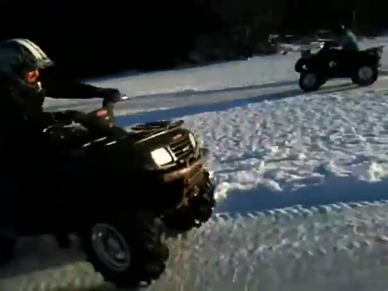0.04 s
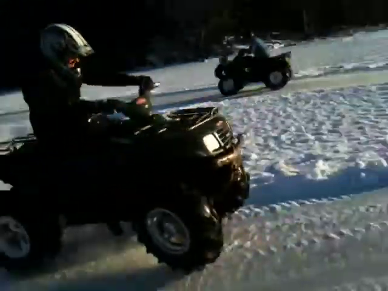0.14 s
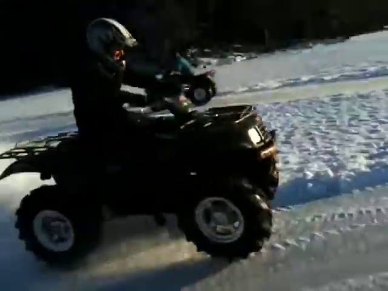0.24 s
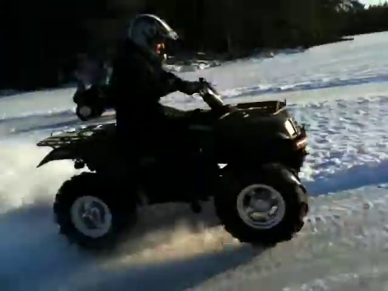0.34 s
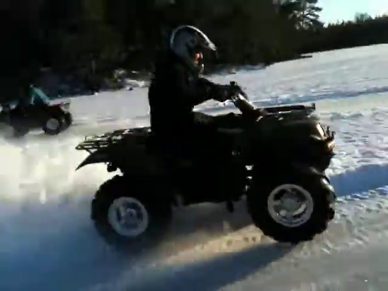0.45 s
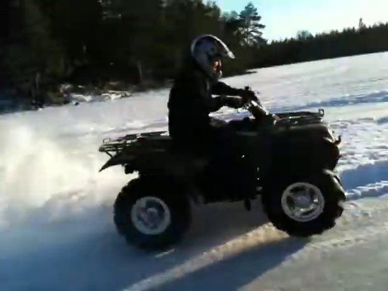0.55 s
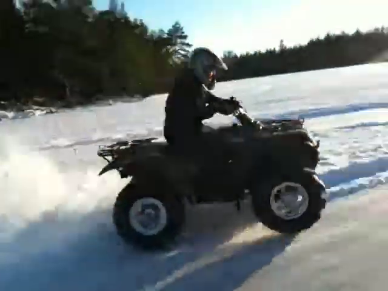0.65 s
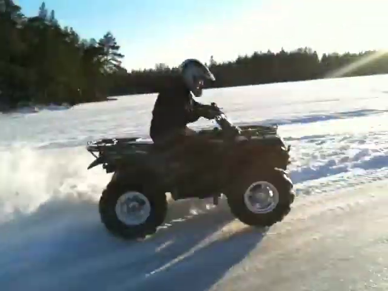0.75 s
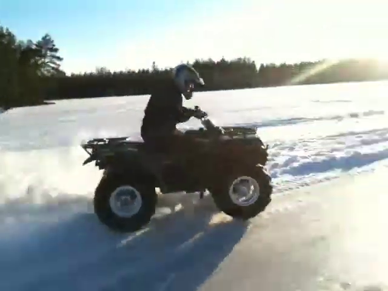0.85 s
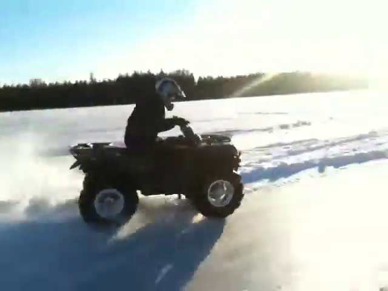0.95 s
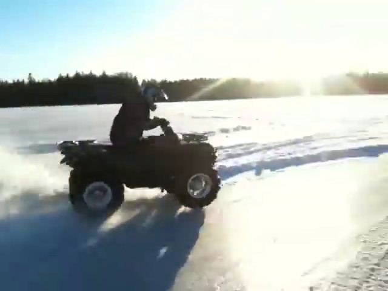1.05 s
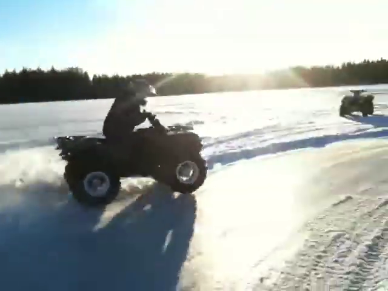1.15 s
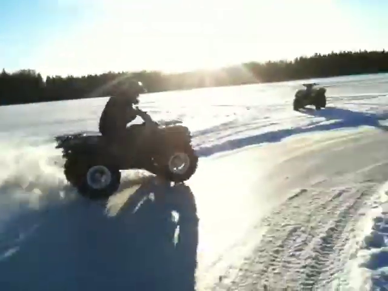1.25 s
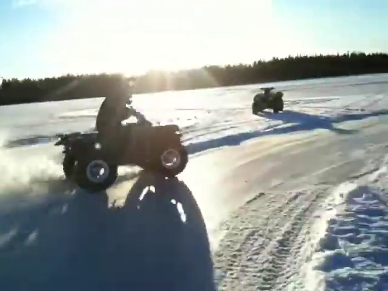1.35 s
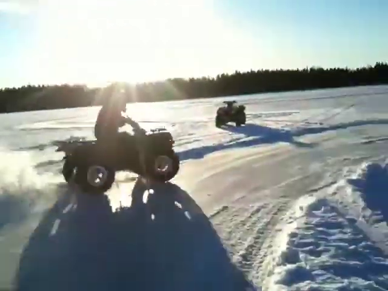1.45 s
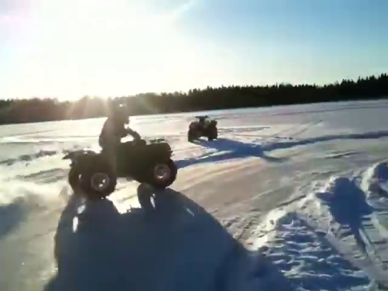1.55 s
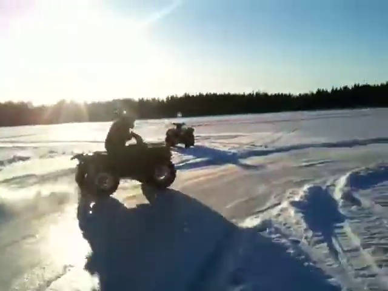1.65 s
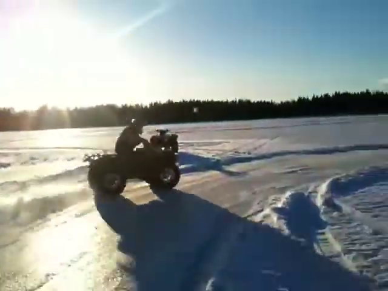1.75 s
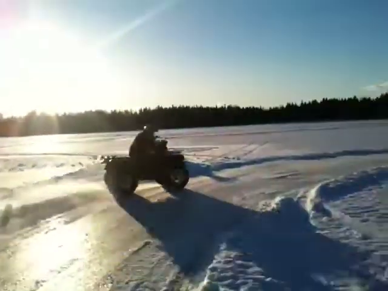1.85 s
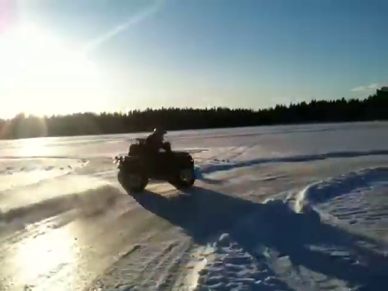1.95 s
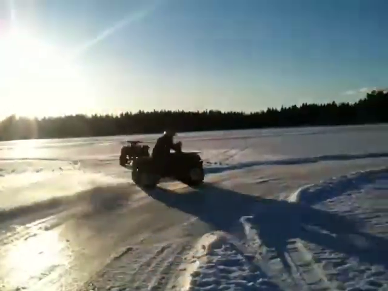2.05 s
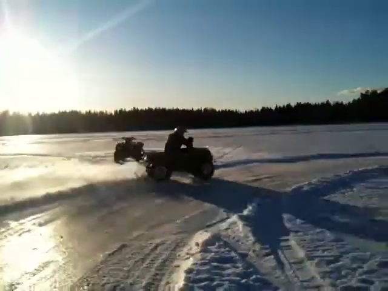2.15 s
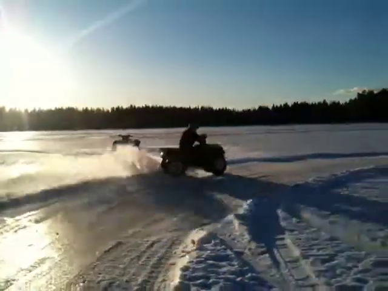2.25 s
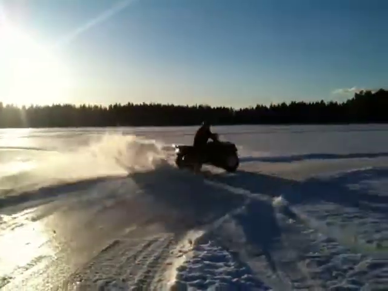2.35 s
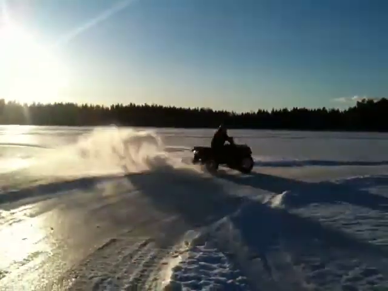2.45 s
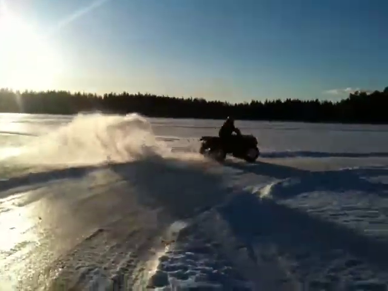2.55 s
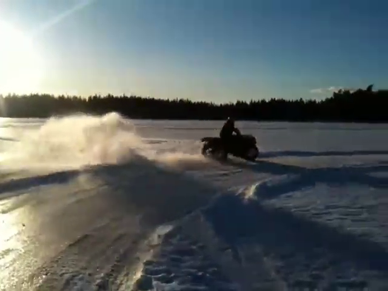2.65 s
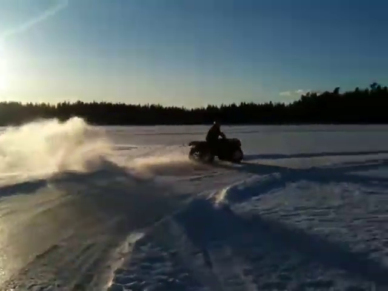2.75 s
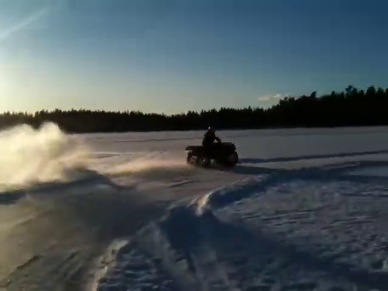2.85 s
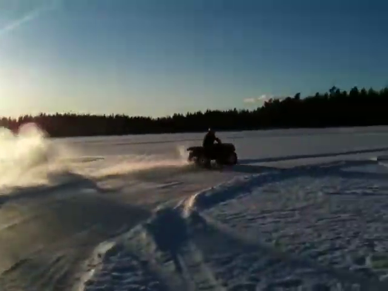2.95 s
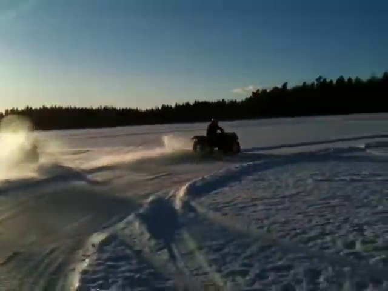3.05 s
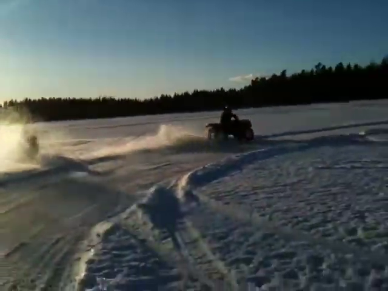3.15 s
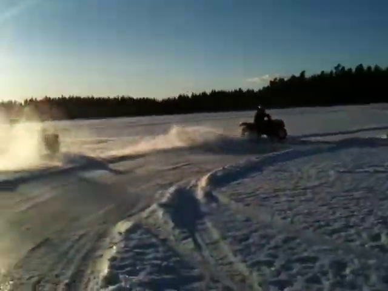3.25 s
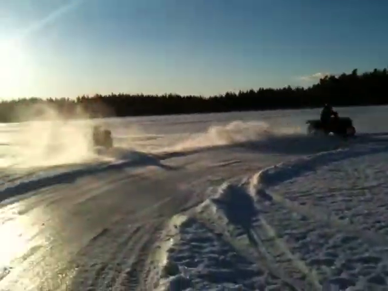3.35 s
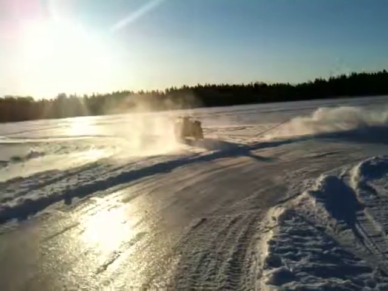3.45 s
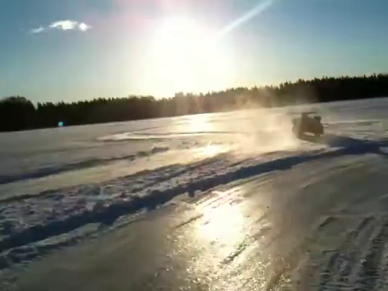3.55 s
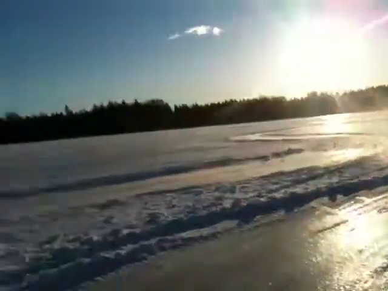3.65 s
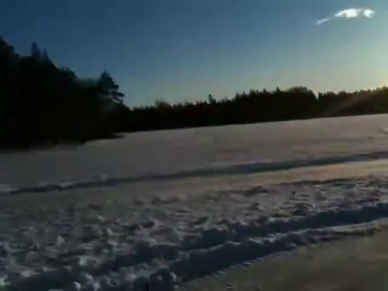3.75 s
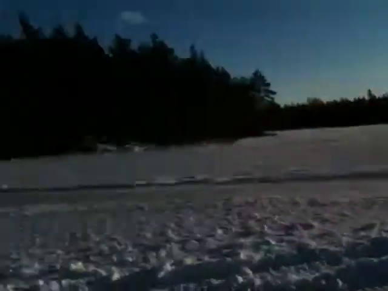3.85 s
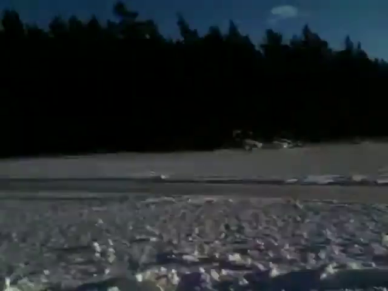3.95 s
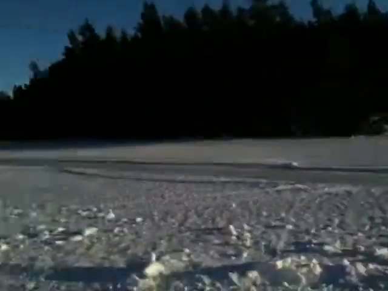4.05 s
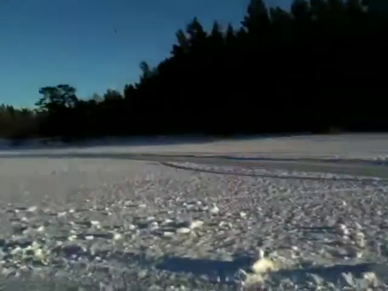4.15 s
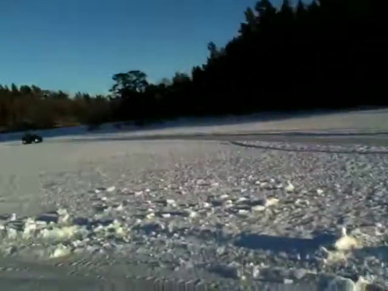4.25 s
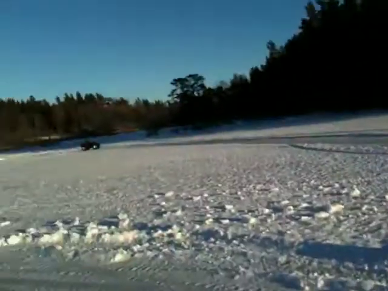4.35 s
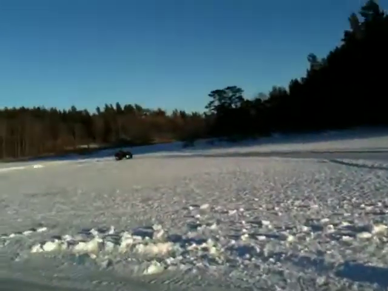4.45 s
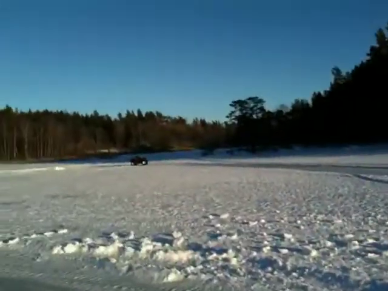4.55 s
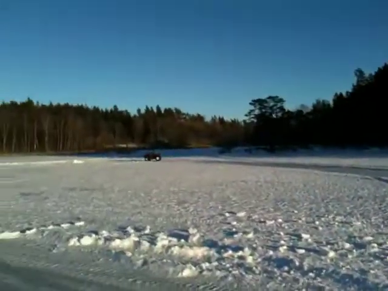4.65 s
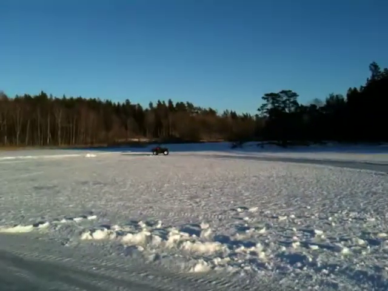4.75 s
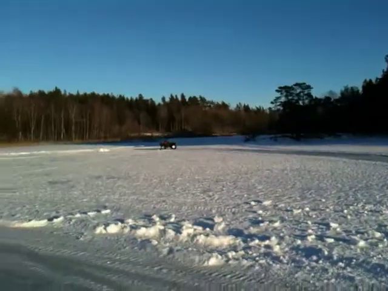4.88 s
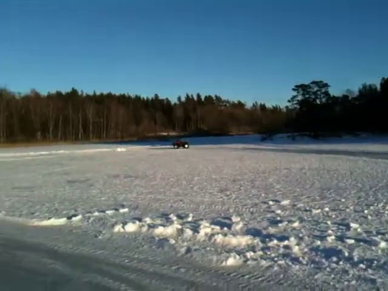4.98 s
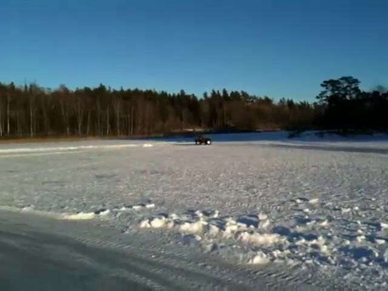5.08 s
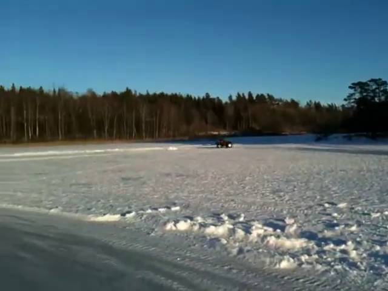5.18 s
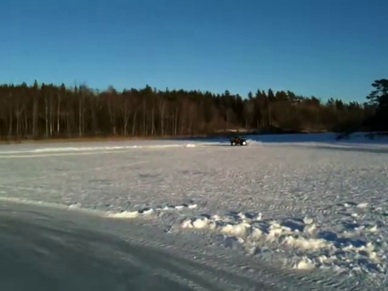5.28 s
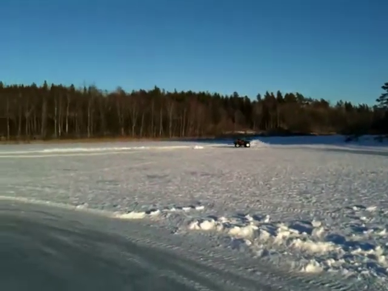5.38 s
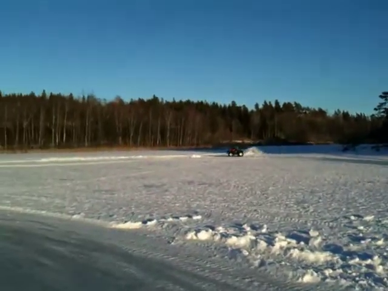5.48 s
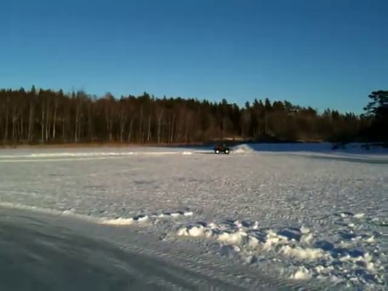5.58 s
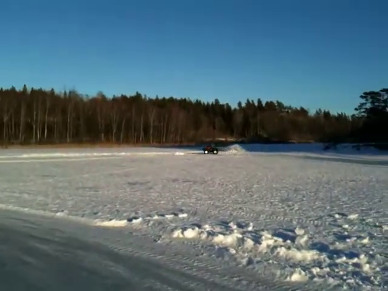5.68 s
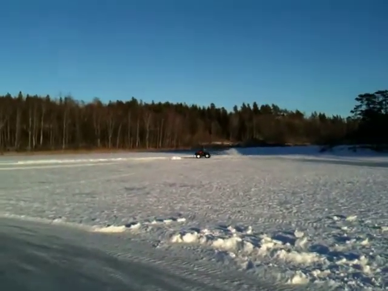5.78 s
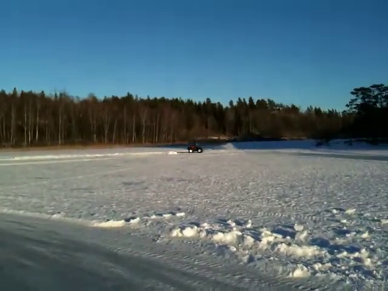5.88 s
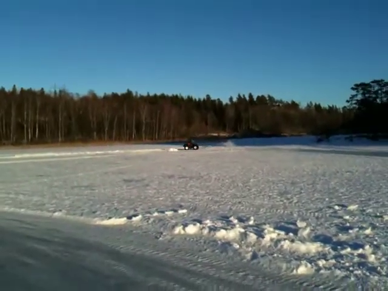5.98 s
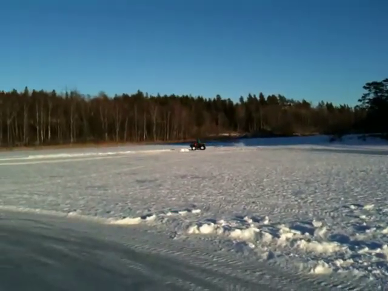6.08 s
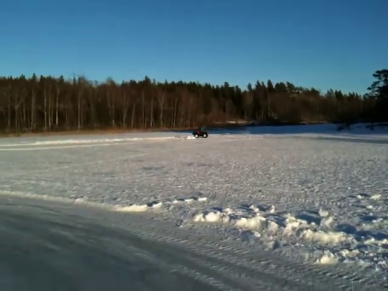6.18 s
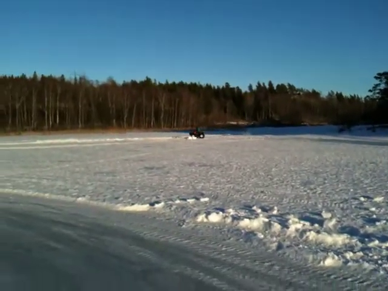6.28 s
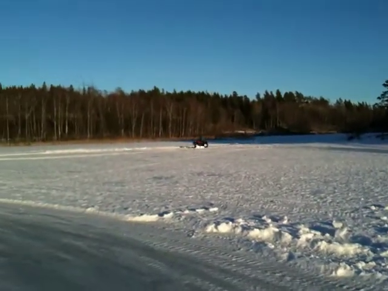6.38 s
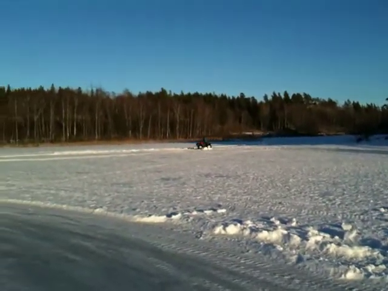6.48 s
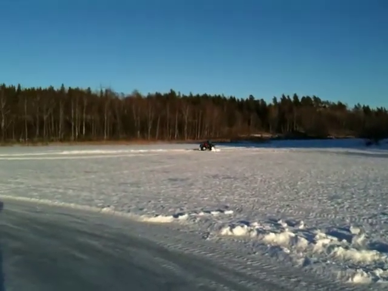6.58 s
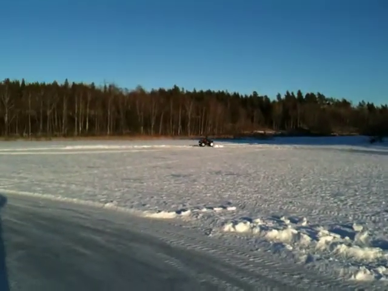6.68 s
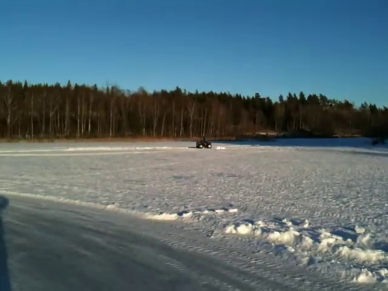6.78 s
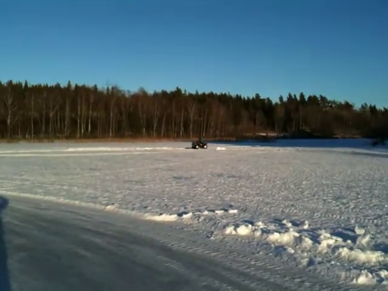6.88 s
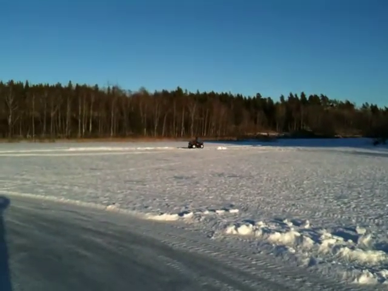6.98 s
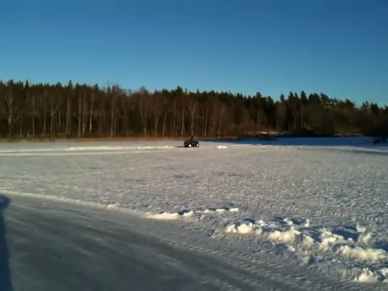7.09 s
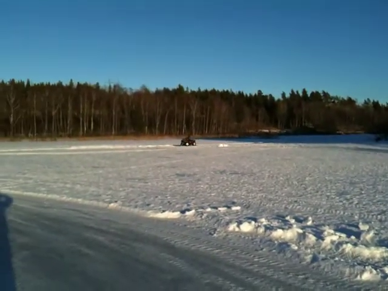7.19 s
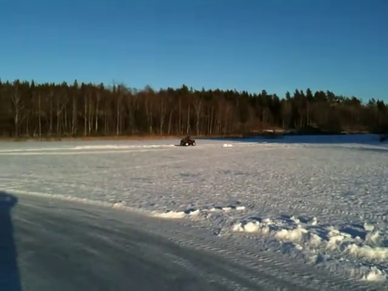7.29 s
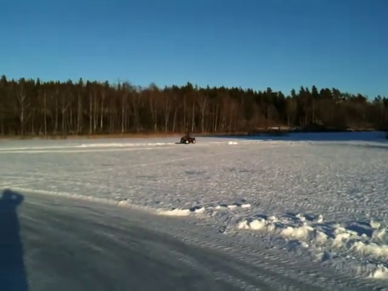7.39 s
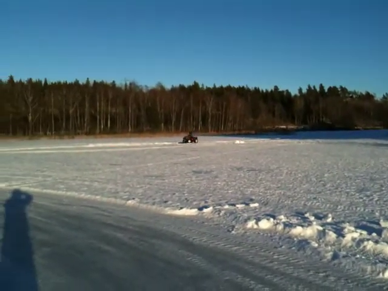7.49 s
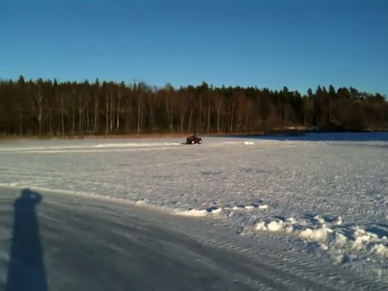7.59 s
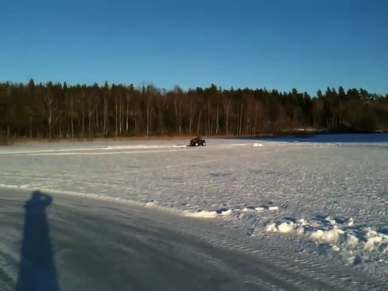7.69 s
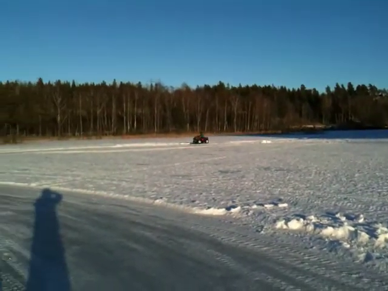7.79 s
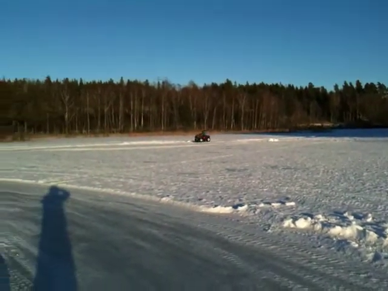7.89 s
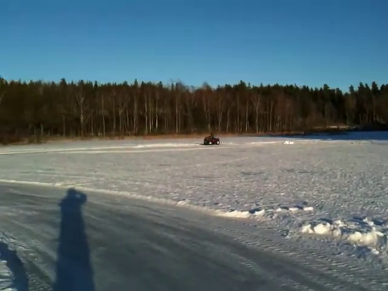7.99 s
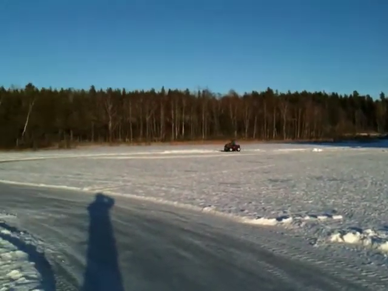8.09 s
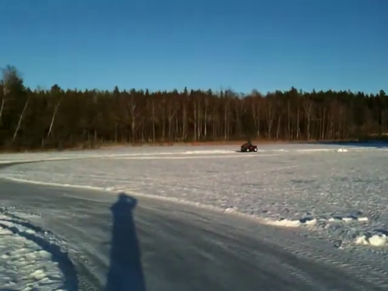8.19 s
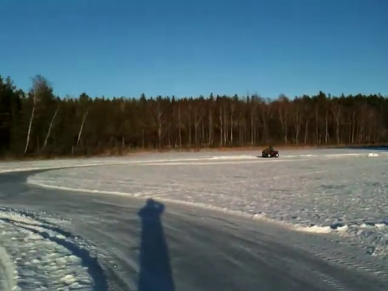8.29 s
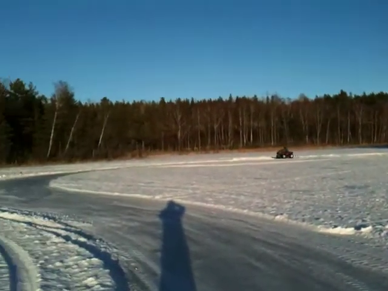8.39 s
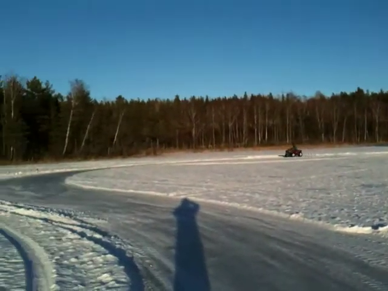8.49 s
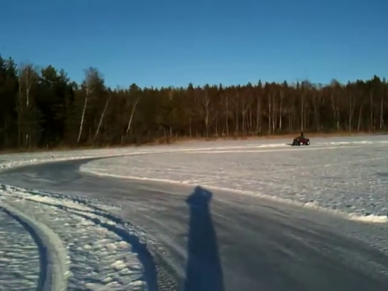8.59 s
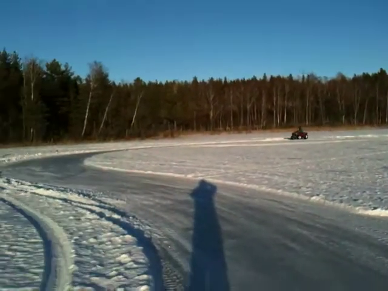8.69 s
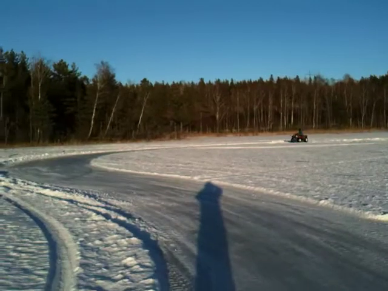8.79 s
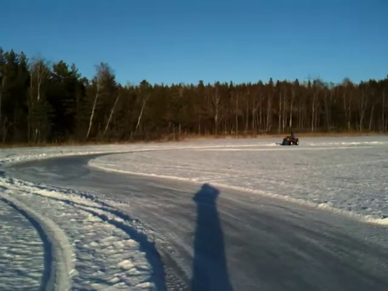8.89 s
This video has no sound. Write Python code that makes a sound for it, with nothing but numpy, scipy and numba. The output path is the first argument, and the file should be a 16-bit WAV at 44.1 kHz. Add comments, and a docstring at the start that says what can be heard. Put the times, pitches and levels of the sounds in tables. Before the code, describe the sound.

A quad bike passes close at full throttle on a frozen lake, its exhaust booming and rasping over hissing tyres and a metallic whine. The pitch dips briefly, then climbs again as it pulls away and fades. Far off, the engine drops low and revs back up with a thin clatter. Gusts thump and rumble on the handheld microphone, and a few faint, dry scuffs sound nearby.

```python
"""On a frozen lake, a quad bike passes at full throttle, eases off for a bend, pulls away and revs far off.
Each four-stroke engine cycle gives two uneven gas pulses that boom, bark and rasp in the exhaust.
Tyres hiss on the ice, the air intake honks, spinning parts whine and whistle; the far engine clatters.
Gusts buffet the microphone of a small handheld camera, which rounds the loudest peaks.
A few dry scuffs sound close by."""
import sys
import numpy as np
from scipy import signal
from scipy.fft import rfft, irfft, next_fast_len
from scipy.io import wavfile
from scipy.ndimage import uniform_filter1d
from numba import njit

SR = 44100
rng = np.random.default_rng(int(sys.argv[2]) if len(sys.argv) > 2 else 0)


def file_out(sig):
    """Save sig as 16-bit WAV at sys.argv[1]."""
    # one column per channel
    cols = np.atleast_2d(sig).T
    # limit, then scale
    lim = np.clip(cols, -1, 1)
    pcm = np.round(lim * 32767).astype(np.int16)
    wavfile.write(sys.argv[1], SR, pcm)


N = 393813
TIME = np.arange(N) / SR


def gain(db):
    """Turn decibels into a multiplier."""
    return 10 ** (np.asarray(db) / 20)


def curves(table):
    """Join a table's rows with straight lines in time: one curve per column after the first."""
    times, *columns = np.transpose(table)
    return [np.interp(TIME, times, column) for column in columns]


def swells(events, attack_s, release_s):
    """A gain that rises, holds and falls for each (start/s, length/s, level/dB) event."""
    return sum(gain(db) * np.clip(np.minimum((TIME - s) / attack_s, (s + length - TIME) / release_s), 0, 1)
               for s, length, db in events)


def colour(x, points):
    """Shape a sound's tone with a curve of (f/Hz, level/dB) points."""
    hz, db = np.transpose(points)
    size = next_fast_len(N // 2 + SR // 2) * 2
    freq = np.maximum(np.arange(size // 2 + 1) * SR / size, 1)
    cepstrum = irfft(np.log(gain(np.interp(np.log(freq), np.log(hz), db))))
    # make the filter ring only after a sound, never before it
    cepstrum[1:size // 2] *= 2
    cepstrum[size // 2 + 1:] = 0
    return irfft(rfft(x, size) * np.exp(rfft(cepstrum)))[:N]


def band(x, low_hz, high_hz):
    """Keep what lies between two frequencies."""
    return signal.sosfilt(signal.butter(3, [low_hz, high_hz], "band", fs=SR, output="sos"), x)


def one_side(x, side, hz, order=3):
    """Keep the "low" or "high" side of a frequency without delaying the sound."""
    return signal.sosfiltfilt(signal.butter(order, hz, side, fs=SR, output="sos"), x)


def ring(x, hz, width):
    """A resonance: it keeps one pitch and weakens the others."""
    return signal.lfilter(*signal.iirpeak(hz, hz / width, fs=SR), x)


@njit
def moving_ring(x, hz, width):
    """A resonance whose pitch and width can move."""
    y, band_state, low_state = np.empty(len(x)), 0., 0.
    damping = width / hz
    for i in range(len(x)):
        tuning = np.tan(np.pi * hz[i] / SR)
        swing = (band_state + tuning * (x[i] - low_state)) / (1 + tuning * (tuning + damping[i]))
        band_state = 2 * swing - band_state
        low_state += 2 * tuning * swing
        y[i] = damping[i] * swing
    return y


def strength(x, size=5000):
    """Average (rms) size of a sound over a few engine cycles."""
    return np.sqrt(np.abs(uniform_filter1d(uniform_filter1d(x ** 2, size), size)) + 1e-18)


def follow(x, db):
    """Make a sound follow a level curve."""
    return x / strength(x) * gain(db)


def decay(x, time_s):
    """Give every pulse a fading tail."""
    return signal.lfilter([1], [1, -np.exp(-1 / (time_s * SR))], x)


def unit(x):
    """Scale to a typical size of 1."""
    return x / np.std(x)


def noise():
    """White noise."""
    return rng.standard_normal(N)


def wander(rate):
    """Drift smoothly to a new random value `rate` times a second."""
    step = int(SR / rate)
    return unit(uniform_filter1d(np.repeat(rng.standard_normal(N // step + 1), step)[:N], step))


# When the rider lets go of the throttle: start/s, end/s
THROTTLE_LIFTS = [(1.805, 2.09), (4.98, 5.6), (5.78, 6.41)]

def throttle_shut(close_s=.08, open_s=.06):
    """How far the throttle is shut: 0 is wide open, 1 is closed."""
    return sum(np.clip(np.minimum((TIME - start) / close_s, 1 - (TIME - end) / open_s), 0, 1)
               for start, end in THROTTLE_LIFTS)


def firings(revs, second_push, second_lag_cycles=.302, scatter_db=.62, jitter_s=.00003):
    """Two pulses a cycle: gas bursts out of the cylinder, then the piston pushes out the rest."""
    elapsed = np.cumsum(revs) / SR
    cycles = np.arange(int(elapsed[-1]))
    pulses = np.zeros(N)
    for lag, push in ((0, np.ones(N)), (second_lag_cycles, second_push)):
        early_late, weak_strong = rng.standard_normal((len(cycles), 2)).T
        at = np.interp(cycles + lag, elapsed, np.arange(N))
        at = np.clip(at + jitter_s * SR * early_late, 0, N - 2)
        i = at.astype(int)
        height = push[i] * gain(scatter_db * weak_strong)
        pulses[i] += height * (1 - at + i)  # shared between two neighbouring samples
        pulses[i + 1] += height * (at - i)
    return pulses


# Engine cycles per second: t/s, f/Hz
ENGINE_SPEED = [(0, 53.8), (.12, 51.83), (.22, 52.07), (.6, 52.16), (.87, 51.72), (1.0, 51.13),
                (1.22, 51.9), (1.4, 50.92), (1.76, 52.78), (1.81, 52.4), (2.09, 36.45), (2.27, 44.21),
                (2.53, 50.6), (2.75, 51.35), (3.08, 51.85), (3.25, 51.1), (3.6, 50.68), (3.85, 50.26),
                (4.1, 50.3), (4.45, 51.96), (4.7, 51.73), (4.97, 52.2), (5.2, 38.8), (5.55, 31.33),
                (5.75, 36.9), (6.0, 29.04), (6.27, 25.2), (6.44, 26.79), (6.73, 33.18), (7.0, 35.93),
                (7.36, 35.64), (7.54, 37.32), (7.95, 37.06), (8.05, 39.65), (8.35, 39.22), (8.93, 41.45)]

def engine(equal_pulses_hz=41.8, growth=1.75):
    revs = curves(ENGINE_SPEED)[0]
    return revs, firings(revs, np.minimum(revs / equal_pulses_hz, 1) ** growth)


# How far away the quad is: t/s, distance/m
DISTANCE = [(0, 3.6), (.6, 3.4), (1.2, 3.79), (1.85, 4.8), (2.25, 8.46), (2.8, 7.5), (3.3, 10.44),
            (4.0, 11.96), (4.95, 15.9), (5.4, 19.5), (6.4, 22.2), (7.2, 26.7), (8.93, 24.8)]

def heard_db(revs, shut, source_db, shut_db, snow_db_per_m, full_revs_hz=52, db_per_octave=7):
    """The exhaust gets louder with revs and throttle, quieter with distance over the snow."""
    metres = curves(DISTANCE)[0]
    at_pipe_db = source_db + db_per_octave * np.log2(revs / full_revs_hz) + shut_db * shut
    return at_pipe_db - 20 * np.log10(metres) - snow_db_per_m * metres


# What changes as the quad turns:
# t/s, roughness/0-1, pulsing share of the rush/0-1, bark's boosted f/Hz, growl level/dB, bark level/dB
HEADING = [(0, 0.6, 0, 800, 2.5, -2.5), (.55, 0.56, 0.03, 770, -1, 1.5), (1.0, 0.52, 0.05, 990, 4.5, -3),
           (1.4, 0.27, .35, 1150, 3.5, -1.5), (1.8, 0.42, 0.41, 1335, 4.5, -7.5),
           (2.1, 0.6, 0.42, 514, 8, 4), (2.8, .06, 0.61, 825, 4.5, 0.5), (3.6, 0, 0.58, 1060, 0.5, 5),
           (4.1, 0.25, 0.29, 1080, 3.5, 1.5), (4.95, 0.2, 0.14, 1259, 1.5, -0.5),
           (5.35, 0.37, .55, 946, -11, 0), (5.7, 0.47, 0.02, 898.4, -17, -4), (6.5, 0.53, .92, 860, 5, -1),
           (6.9, 0.57, 0.02, 850, -9, -3), (8.93, 0.73, .1, 867.8, 8.5, 6)]
# Tone of the silencer and of the header, the pipe leaving the engine: f/Hz, level/dB
SILENCER_TONE = [(50, -34.5), (100, -7), (150, 4), (185, 7.5), (210, -3.5), (260, -8), (320, -16),
                 (450, -58), (1200, -57)]
HEADER_TONE = [(100, -58), (230, 5), (300, 5), (365, 3.5), (415, 5.5), (480, -1.5), (600, 1), (1500, -67)]
# Pitches the tailpipe rings at: f/Hz, width/Hz, level/dB
TAILPIPE_RINGS = [(574, 71, 40), (652, 100, 44), (828, 61, 39), (961, 76, 34), (1194, 63, 20),
                  (1350, 60, 20.5), (1450, 91, 17), (1700, 81, 21)]

def exhaust(pulses, revs, shut, least_roughness=.2, bark_roughness=.85, vowel_db=3):
    """The pulses boom in the silencer, growl in the header and bark in the tailpipe."""
    roughness, _, vowel_hz, growl_db, bark_db = curves(HEADING)
    swirl = np.hypot(roughness, least_roughness) * strength(pulses) * noise()  # fills the gaps
    boom = colour(pulses + swirl, SILENCER_TONE)
    growl = colour(pulses + swirl, HEADER_TONE)
    jet = pulses + bark_roughness * swirl
    bark = -band(sum(gain(db) * ring(jet, hz, width) for hz, width, db in TAILPIPE_RINGS), 448, 6200)
    bark += gain(vowel_db) * moving_ring(bark, vowel_hz, width=240.)  # its vowel shifts as the quad turns
    boom_db = heard_db(revs, shut, source_db=-3.5, shut_db=-.087, snow_db_per_m=.038)
    growl_db += heard_db(revs, shut, source_db=-8.5, shut_db=-8, snow_db_per_m=.74)
    bark_db += heard_db(revs, shut, source_db=-2, shut_db=-9, snow_db_per_m=1.25)
    return follow(boom, boom_db) + follow(growl, growl_db) + follow(bark, bark_db)


# Tone of the escaping gas: f/Hz, level/dB
GAS_TONE = [(300, -22), (600, -13), (1100, -9), (1600, -5), (2150, 1.5), (2750, -.5), (3400, -12),
            (3900, -10), (4800, -4.5), (5500, -9), (6200, -13), (7200, -9.5), (8000, -14), (8900, -21),
            (15500, -20)]
# Pitches the pipe's mouth rings at: f/Hz, width/Hz, level/dB
MOUTH_RINGS = [(2130, 200, -6), (2730, 140, -5), (4150, 250, -11), (4870, 220, -8), (7380, 300, -11)]

def gas(pulses, puffs, crack):
    """Each pulse leaves the pipe as a sharp crack with a noisy puff behind it."""
    jet = noise() * puffs / strength(puffs) + crack * pulses / strength(pulses)
    jet = colour(jet / np.hypot(1, crack), GAS_TONE)
    return jet + sum(gain(db) * ring(jet, hz, width) for hz, width, db in MOUTH_RINGS)


# Tone of the tyres on the ice: f/Hz, level/dB
TYRE_TONE = [(60, -20), (150, -7), (300, -3), (800, -4.5), (1600, -3.5), (2700, .5), (3200, -4), (3750, -6),
             (4080, -3.5), (4500, -8), (5000, -9), (6300, -7), (8500, -14), (11000, -19), (15500, -26)]

def tyres(grit_db=2, spray_db=1):
    """Tyres throw snow with a gritty, uneven hiss."""
    return colour(unit(noise() * gain(grit_db * wander(900) + spray_db * wander(40))), TYRE_TONE)


# Rush of gas and tyres with the throttle open: t/s, level/dB, treble offset/dB
RUSH_LEVELS = [(0, -21.5, -6.5), (.65, -21.5, -5.5), (1.25, -21.5, -6), (1.45, -21, -5), (1.8, -25, -6),
               (2.15, -32, -5.5), (2.55, -26.5, -6), (3.1, -30, -5), (3.3, -29.5, -5.5), (3.7, -33, -4.5),
               (4.04, -39.5, -7.5), (4.2, -48, -8), (4.6, -48.5, -11), (5.05, -50, -5.5), (5.55, -52.5, -3),
               (5.75, -52.5, -2.5), (6.65, -57, 1.5), (7.2, -55, -5), (7.75, -57, -5.5), (8.15, -49.5, -2),
               (8.72, -53.5, -6.5), (8.93, -47.5, -7.5)]

def rush(pulses, shut, puff_s=.0022, jet_s=.0013, split_hz=3200, crackle_db=2.3,
         shut_db=-4, treble_shut_db=-2.5, absorption=.27, near_db=-34, clear_db=-4):
    """Gas and tyres blend into a lower rasp and a higher hiss; both drop when the throttle shuts."""
    level_db, treble_db = curves(RUSH_LEVELS)
    level_db += shut_db * shut
    gas_share = np.clip(curves(HEADING)[1] * (1 - shut), 0, 1)

    def blend(puffs, crack):
        return np.sqrt(gas_share) * gas(pulses, puffs, crack) + np.sqrt(1 - gas_share) * tyres()

    puffs = decay(pulses, puff_s)
    rasp = blend(puffs, crack=.6)
    rasp = (rasp - one_side(rasp, "high", split_hz)) / strength(band(rasp, 1900, 3100))
    # when the treble is screened off, the rasp gets duller too
    tilt_db = np.minimum(treble_db - clear_db, 0)
    body = one_side(rasp, "low", 2100)
    rasp = body * gain(-tilt_db) + (rasp - body) * gain(tilt_db)
    # the jet's hiss builds a little later
    late_puffs = decay(puffs, jet_s) * gain(crackle_db * wander(120))
    hiss = one_side(blend(late_puffs, crack=0), "high", split_hz)
    # the very top comes at the start of each puff; air soaks it up when the quad is far and faint
    top = one_side(hiss, "high", 8500, order=2)
    spit = (puffs / strength(puffs) + 1e-9) ** (gas_share / 2)
    hiss += top * (spit * gain(absorption * (level_db - near_db)) - 1)
    return rasp * gain(level_db) + follow(hiss, level_db + treble_db + treble_shut_db * shut)


# A dip that slides through the treble: t/s, f/Hz, width/Hz, depth/0-1
TREBLE_DIP = [(0, 1800, 500, 0.5), (.5, 1650, 450, 0.53), (.75, 1550, 400, 0.33), (1.05, 1895, 450, 0.15),
              (1.4, 2120, 500, 0.87), (1.8, 2150, 496, .4), (2.3, 1570, 452, 0.4), (3.0, 1685, 452.5, 0.58),
              (3.8, 1909, 598.7, 0.26), (4.03, 2680, 1500, 0), (4.13, 2700, 1700, 0.8),
              (4.21, 2234, 1700, 0.66), (4.34, 2197, 1703, 0.5), (4.48, 3470, 1720, 1),
              (4.65, 3687, 1700, .5), (4.95, 3205, 1704, 0.71), (5.7, 2780, 1700, 0.5),
              (6.2, 2800, 1695, 0.4), (7.4, 2700, 1700, 0), (8.93, 2691, 1700, 0.38)]

def sliding_dip(x):
    """Weaken one moving band, so the quad dulls and brightens as it travels."""
    hz, width, depth = curves(TREBLE_DIP)
    return x - depth * moving_ring(x, hz, width)


# Honk of the air box, where the engine breathes in: t/s, f/Hz, level/dB
INTAKE_HONK = [(0, 267, -16), (.22, 257.8, -21), (.45, 262, -27.5), (1.0, 257, -32), (1.6, 262, -33),
               (2.1, 257, -43), (3.4, 255, -41), (4.1, 251, -47.5), (4.95, 275, -35), (5.2, 205, -41),
               (5.58, 189.4, -44), (5.73, 208, -28.5), (5.86, 207, -49), (6.15, 173, -59),
               (6.4, 152.4, -73), (6.6, 168.1, -40.5), (6.95, 207.2, -33), (7.6, 215, -32.5),
               (8.1, 227.5, -33), (8.93, 240, -32.5)]

def intake(revs, width_hz=70.):
    """One gulp of air a cycle makes the air box honk."""
    hz, db = curves(INTAKE_HONK)
    gulps = firings(revs, second_push=np.zeros(N))
    roughness = curves(HEADING)[0]
    air = gulps + roughness * strength(gulps) * noise()
    return follow(moving_ring(moving_ring(air, hz, width_hz), hz, width_hz), db)


def spin(hz, revs, waver, ripple_rad):
    """Angle of a spinning part whose speed wavers, and ripples with each engine cycle."""
    angle = 2 * np.pi * np.cumsum(hz * (1 + waver * wander(300))) / SR
    return angle + ripple_rad * np.sin(2 * np.pi * np.cumsum(revs) / SR)


# Whine of the drive: t/s, f/Hz, level/dB, overtone level/dB
DRIVE_WHINE = [(0, 1309, -29, -38), (.14, 1308, -35.5, -33), (.3, 1369, -27.5, -44),
               (.5, 1380, -28.5, -31.5), (.62, 1395, -32, -30), (.78, 1396, -28, -33),
               (.98, 1421, -25, -44), (1.33, 1406, -30.5, -30), (1.47, 1449, -40, -53),
               (1.56, 1698, -32, -38), (1.78, 1753, -30.5, -41), (1.88, 1590, -47, -47),
               (2.1, 1233, -38, -54), (2.22, 1162, -37, -40), (2.45, 1151, -59, -61)]
# Its overtones, the higher tones above it: multiple of f, level offset/dB
WHINE_OVERTONES = [(2, 0), (3, -6), (5, -6)]

def whine(revs, flutter_db=2):
    """The drive sings with fluttering metallic tones until the quad turns away."""
    hz, main_db, overtone_db = curves(DRIVE_WHINE)
    angle = spin(hz, revs, waver=.0077, ripple_rad=.7)
    tones = [(.99, main_db)]  # the lowest tone is slightly flat
    tones += [(multiple, overtone_db + db) for multiple, db in WHINE_OVERTONES]
    sound = sum(np.sin(multiple * angle) * gain(db + flutter_db * wander(34.62)) for multiple, db in tones)
    near = TIME < DRIVE_WHINE[-1][0]
    return near * np.sqrt(2) * sound


# Tone of the lake's background: f/Hz, level/dB
LAKE_TONE = [(30, -12), (120, 0), (300, -4), (600, -10), (2500, -15), (6000, -21), (15000, -42)]

def lake(level_db=-60):
    """A faint, low hush that slowly rises and falls."""
    return unit(colour(noise(), LAKE_TONE)) * gain(level_db + wander(1.75))


# Whistles of the running gear: start/s, length/s, first f/Hz, last f/Hz, level/dB
GEAR_WHISTLES = [(0.947, 0.6, 5790, 5770, -38.5), (1.506, 0.35, 6050, 6470, -41),
                 (2.098, 0.18, 5897, 5900, -37.5), (2.589, 0.52, 7030, 7400, -48),
                 (2.759, 0.26, 5710, 5895, -45), (3.099, 0.57, 7500, 7140, -53),
                 (4.97, 0.22, 3160, 2880, -62), (5.722, 0.14, 6050, 5660, -60),
                 (6.75, 0.52, 1775, 1590, -64), (6.98, 0.4, 5700, 5550, -71), (7.34, .4, 5577, 6100, -76),
                 (7.759, 0.24, 2523, 2577, -59), (7.95, 0.44, 6350, 6440, -76), (8.42, .3, 5900, 5784, -69),
                 (8.762, 0.19, 2290, 2270, -66)]

def whistles(revs, flutter_db=3, fade_s=.07):
    """Spinning parts give short, thin, unsteady whistles that glide in pitch."""
    out = 0
    for s, length, first_hz, last_hz, db in GEAR_WHISTLES:
        hz = curves([(s, first_hz), (s + length, last_hz)])[0]
        angle = spin(hz, revs, waver=.015, ripple_rad=1.4)
        out += np.sin(angle) * swells([(s, length, db)], fade_s, fade_s)
    return np.sqrt(2) * out * gain(flutter_db * wander(35.1))


# Tone of wind on the microphone: f/Hz, level/dB
WIND_TONE = [(30, -27), (70, -23.5), (120, -0.5), (190, -1.5), (280, 1), (450, -6.5), (700, -17),
             (1200, -38), (3000, -83)]
# Gusts of wind: start/s, length/s, level/dB
WIND_GUSTS = [(.98, 0.12, -21), (1.07, 0.13, -14.5), (1.19, 0.2, -16.5), (3.87, 0.12, -29),
              (4.18, 0.14, -40), (4.29, 0.16, -30.5), (4.48, 0.043, -32), (4.7, 0.18, -49),
              (5.88, 0.16, -46.5), (6.74, 0.3, -38.5), (6.99, 0.22, -36), (7.19, 0.15, -32.5),
              (7.32, 0.16, -44), (7.65, 0.26, -38), (7.9, 0.18, -36), (8.08, .28, -43), (8.37, 0.69, -35.5)]
FLAP_BAND_HZ = (412, 796)

def gusts(eddy_db=3.5, surge_db=1.5, tear_db=-25):
    """Swirls of air rumble on the microphone, with a tearing sound at their peaks."""
    flutter = gain(eddy_db * wander(90) + surge_db * wander(25))
    rumble = unit(colour(noise() * flutter, WIND_TONE))
    tearing = unit(band(noise(), *FLAP_BAND_HZ) * flutter ** 2)
    return (rumble + gain(tear_db) * tearing) * swells(WIND_GUSTS, attack_s=.015, release_s=.021)


# Single slaps of wind: t/s, relative thump level/dB, relative flap level/dB
WIND_BUFFETS = [(3.884, -14, -23), (3.92, -30, -35), (3.968, -24, -44), (3.996, -13, -36),
                (4.026, -17, -27), (4.214, -13.5, -35), (4.283, -20, -37), (4.311, -11, -34),
                (4.337, -11.5, -22), (4.358, -13.5, -31), (4.39, -17, -35), (4.423, -16, -32),
                (4.508, -12.5, -30), (4.733, -21, -44), (5.909, -20, -52), (5.971, -25, -52),
                (6.182, -20, -49), (6.241, -12.5, -33), (6.618, -14, -36), (6.777, -16.5, -34),
                (6.819, -18.5, -44), (6.889, -16.5, -42), (6.95, -26, -44), (7, -16, -39),
                (7.016, -21, -33), (7.033, -11.5, -22.5), (7.054, -19, -42), (7.088, -14, -42),
                (7.115, -21, -38), (7.182, -18, -39), (7.205, -15, -43), (7.232, -18, -40),
                (7.241, -10.5, -28), (7.272, -27, -39), (7.299, -19, -32), (7.397, -17, -48),
                (7.67, -23.5, -39), (7.747, -20, -32), (7.806, -21, -30), (7.834, -16.5, -42),
                (7.877, -19, -29), (7.935, -23, -27), (7.958, -13.5, -33), (8.032, -16, -27),
                (8.15, -21, -49), (8.33, -23.5, -50), (8.394, -16.5, -26), (8.481, -21, -28),
                (8.509, -11.5, -38), (8.616, -20, -44), (8.655, -21, -34), (8.705, -11.5, -23),
                (8.724, -12, -28), (8.825, -19, -42)]

def buffets(thump_hz=223, pitch_spread=.19, thump_s=.0022, flap_s=.0016, thump_db=-1.5, flap_db=-3):
    """The strongest swirls hit the microphone as a low thump with a flapping edge."""
    flap = band(noise(), *FLAP_BAND_HZ)
    t = np.arange(SR // 20) / SR
    slaps = np.zeros(N)

    def burst(air, rise_s, peak_db):
        shaped = air * t ** 2 * np.exp(-2 * t / rise_s)
        return shaped / np.abs(shaped).max() * gain(peak_db)

    for s, low_db, edge_db in WIND_BUFFETS:
        detune, phase = rng.uniform(-1.02, 1, 2)
        thump = np.sin(2 * np.pi * thump_hz * (1 + pitch_spread * detune) * t + np.pi * phase)
        span = slice(int(s * SR), int(s * SR) + len(t))
        slaps[span] += burst(thump, thump_s, low_db + thump_db)
        slaps[span] += burst(flap[span], flap_s, edge_db + flap_db)
    return band(slaps, 104, 2300)


# Soft swishes far off: start/s, length/s, first f/Hz, last f/Hz, level/dB
FAR_SWISHES = [(4.017, 0.3, 4200, 4400, -58), (4.24, 0.18, 3700, 3450, -57.5),
               (4.752, 0.23, 5616, 4745, -57)]

def swishes(pulses, width_hz=1100., fade_s=.05, puff_s=.0054):
    """Narrow bands of the exhaust's pulsing hiss slide in pitch."""
    out, puffs = 0, decay(pulses, puff_s)
    for s, length, first_hz, last_hz, db in FAR_SWISHES:
        hz = curves([(s, first_hz), (s + length, last_hz)])[0]
        hiss = moving_ring(moving_ring(noise() * puffs, hz, width_hz), hz, width_hz)
        out += unit(hiss) * swells([(s, length, db)], fade_s, fade_s)
    return out


# Tone of a dry rub: f/Hz, level/dB
RUB_TONE = [(290, -64), (500, -0.5), (552, -10), (990, -5.5), (1470, -9), (2430, -22), (2680, -16.5),
            (6480, -31), (11900, -50), (15000, -47)]
# Scuffs close by: start/s, length/s, rub level/dB, powder level/dB
NEAR_SCUFFS = [(4.943, 0.07, -41.5, -75), (6.225, .13, -45.5, -57.5), (6.334, 0.087, -40.5, -68),
               (8.016, 0.027, -40, -71)]

def scuffs(grain_db=3, attack_s=.017, release_s=.0064):
    """Short grainy rubs with a powdery hiss, like a boot on packed snow."""
    grains = noise() * gain(grain_db * wander(600))
    rub = swells([(s, length, db) for s, length, db, _ in NEAR_SCUFFS], attack_s, release_s)
    powder = swells([(s, length, db) for s, length, _, db in NEAR_SCUFFS], attack_s, release_s)
    return unit(colour(grains, RUB_TONE)) * rub + unit(band(grains, 2182, 10400)) * powder


# Thin treble bands in the far engine's pulsing clatter: f/Hz, width/Hz, level/dB
CLATTER_BANDS = [(2350, 420, 0), (3250, 520, -2.5), (4200, 850, -2.5), (5850, 600, -11)]
# The clatter is heard once the far quad turns back: t/s, level/dB
CLATTER_LEVELS = [(6.38, -95), (6.48, -63), (6.65, -53), (6.95, -55.5), (7.55, -62), (8.2, -57.5),
                  (8.93, -57.5)]

def clatter(pulses, rattle_s=.009):
    """Each firing gives a short burst of noise, heard across the ice as a thin, high clatter."""
    rattle = noise() * decay(pulses, rattle_s)
    bands = sum(gain(db) * ring(ring(rattle, hz, width), hz, width) for hz, width, db in CLATTER_BANDS)
    return follow(bands, curves(CLATTER_LEVELS)[0])


def scene():
    """Add the quad, the wind, the scuffs and the lake's hush into one channel."""
    revs, pulses = engine()
    shut = throttle_shut()
    quad = sliding_dip(exhaust(pulses, revs, shut) + rush(pulses, shut))
    quad += intake(revs) + clatter(pulses) + whine(revs) + whistles(revs) + swishes(pulses)
    return (quad + gusts() + buffets() + scuffs() + lake())[None]


def record(dry, bass_cut_hz=45, ceiling=.72, top_hz=15900):
    """The camera cuts the deep bass, rounds the loudest peaks and cuts the highest treble."""
    thinned = one_side(dry, "high", bass_cut_hz, order=1)
    rounded = thinned / (1 + (thinned / ceiling) ** 8) ** (1 / 8)
    return signal.sosfilt(signal.ellip(10, .2, 70, top_hz, fs=SR, output="sos"), rounded)


dry = scene()
out = record(dry)
file_out(out)
```